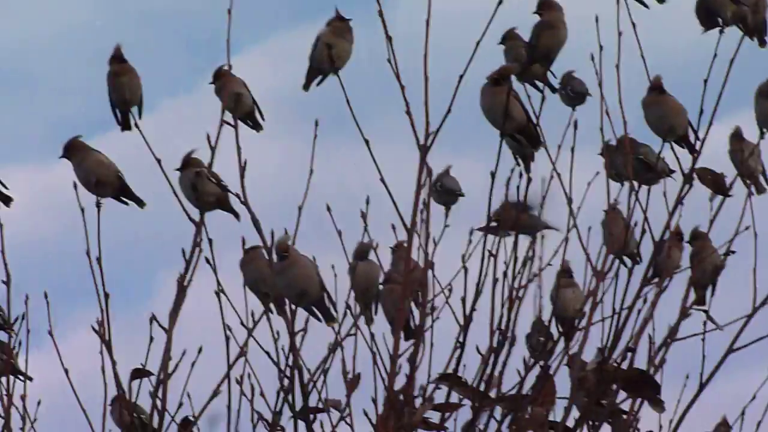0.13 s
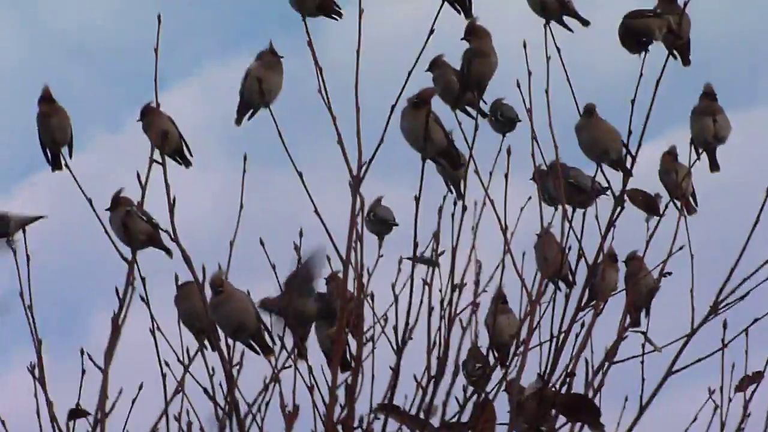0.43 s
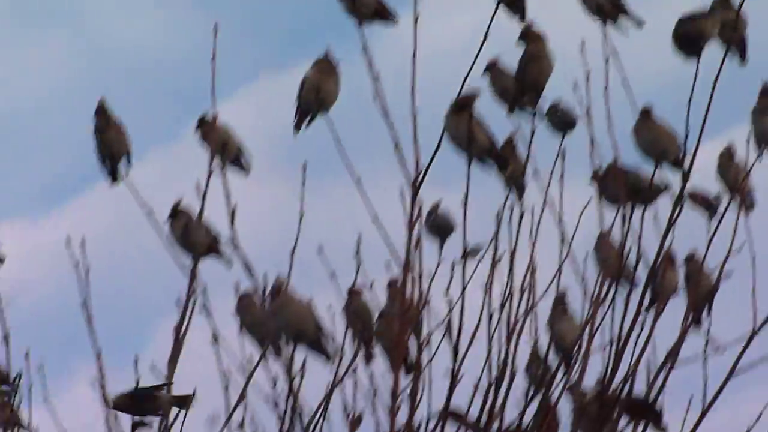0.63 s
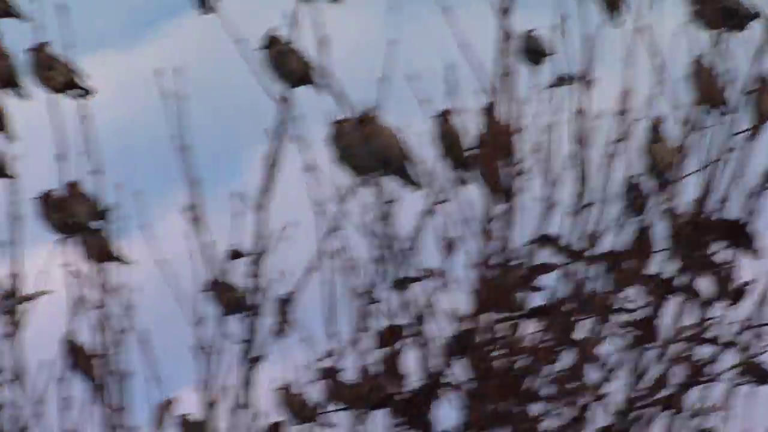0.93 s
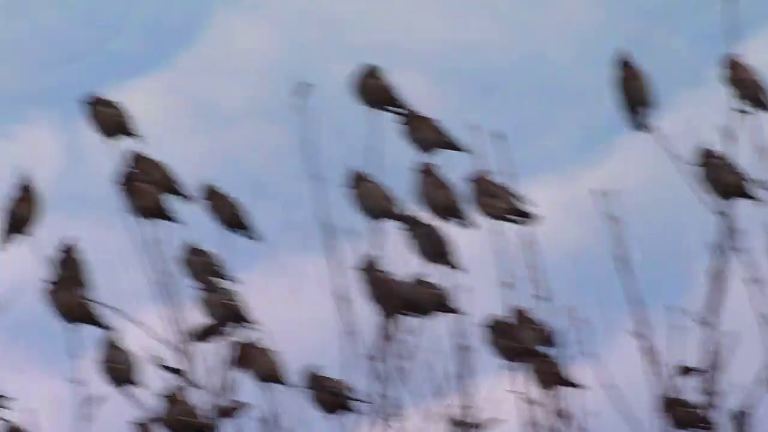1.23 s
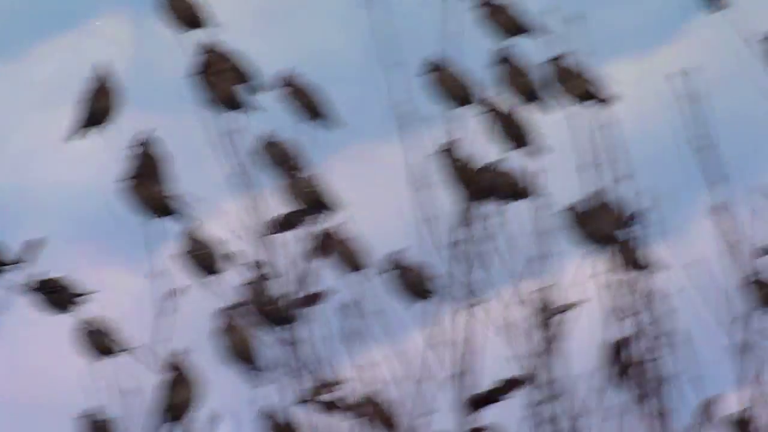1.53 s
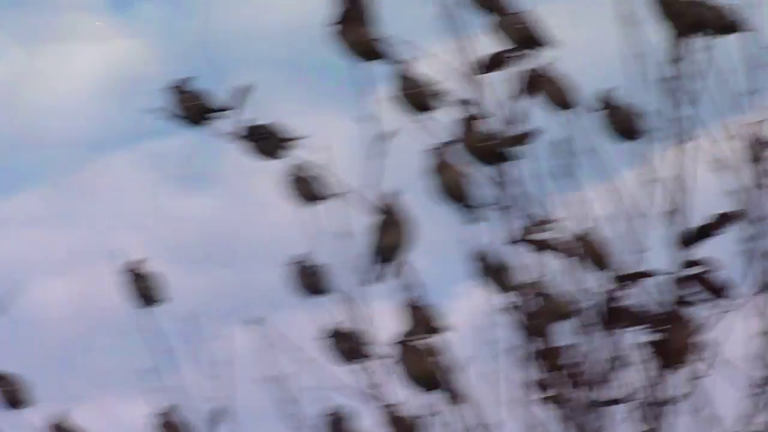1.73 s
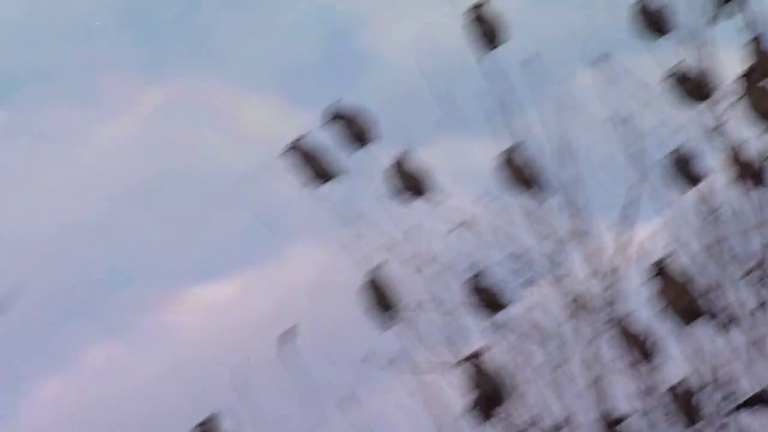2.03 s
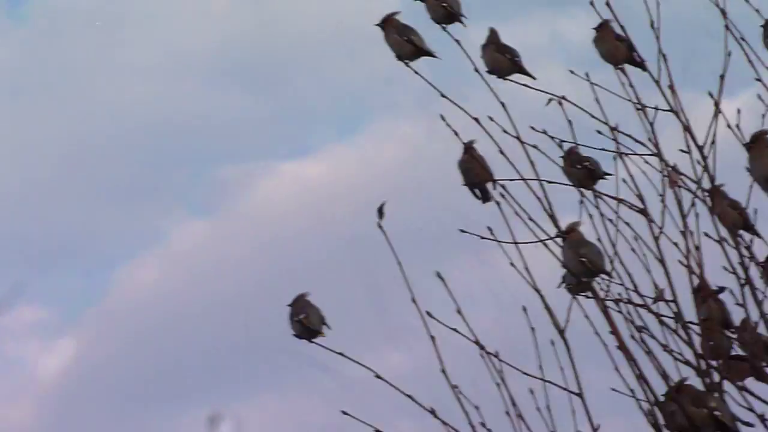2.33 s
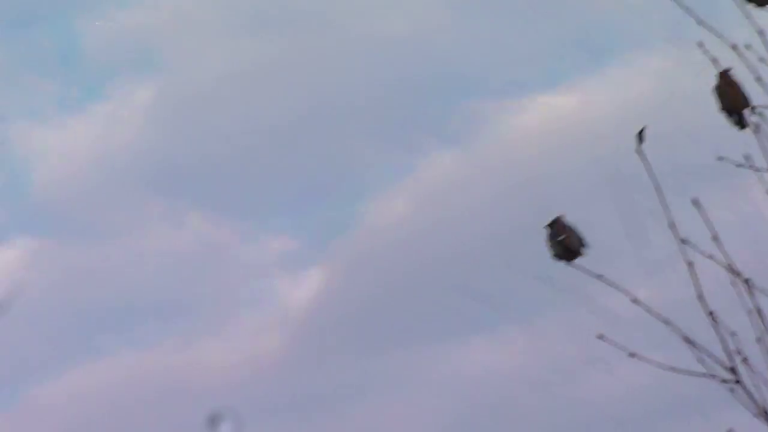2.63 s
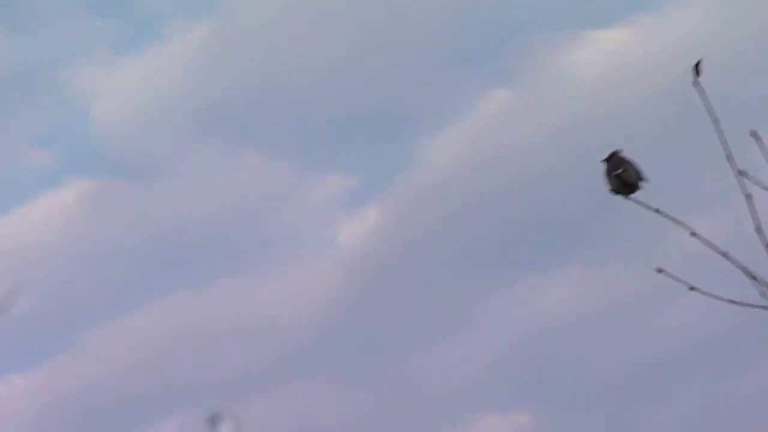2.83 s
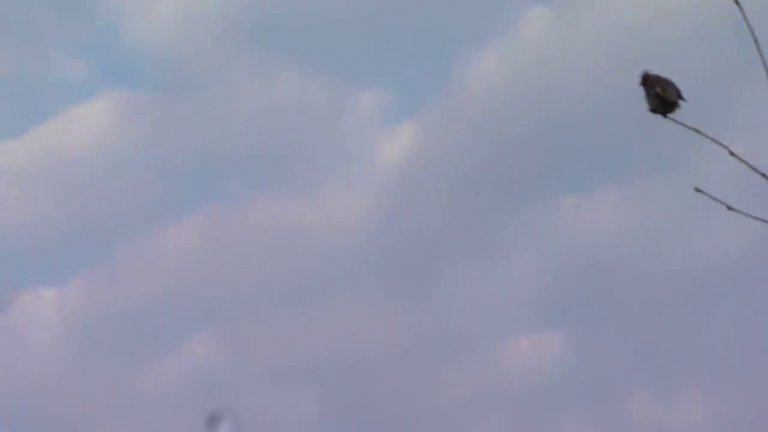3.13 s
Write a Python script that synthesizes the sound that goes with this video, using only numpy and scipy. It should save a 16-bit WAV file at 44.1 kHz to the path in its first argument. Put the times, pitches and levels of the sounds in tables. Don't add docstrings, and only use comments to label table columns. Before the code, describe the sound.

Small birds trill outdoors, each a rapid string of high, thin whistles gliding down to a raspy drop around 5 to 7 kHz. Faint at first, trills thicken and strengthen from about 1 second, overlapping until the end at about 3.3. Low distant traffic roars steadily. Twigs crack sharply at 0.53 and 0.73, tick at 1.48 and 2.79; faint wings rustle near 0.25 and 1.47. Short echo, dull treble.

```python
import sys
import numpy as np
from scipy import signal
from scipy.fft import rfft, irfft, next_fast_len
from scipy.io import wavfile
from scipy.ndimage import uniform_filter1d

SR = 44100
rng = np.random.default_rng(int(sys.argv[2]) if len(sys.argv) > 2 else 0)


def wav_out(sig):
    wavfile.write(sys.argv[1], SR, np.round(np.clip(np.atleast_2d(sig).T, -1, 1) * 32767).astype(np.int16))


def attenuation_scalar(level_db):
    decades = np.asarray(level_db, float) / 20
    return 10 ** decades


N = 145530


def evened(x):
    return x / np.sqrt(np.mean(x ** 2) + 1e-20)


def read(points, hz):
    point_hz, db = np.transpose(points)
    return np.interp(np.log(hz + 1), np.log(point_hz + 1), db)


def add(mix, start_s, sound):
    at = round(start_s * SR)
    sound = sound[max(-at, 0):]
    part = mix[max(at, 0):][:len(sound)]
    part += sound[:len(part)]


def band(x, low_hz, high_hz, order=2):
    return signal.sosfilt(signal.butter(order, [low_hz, high_hz], "band", fs=SR, output="sos"), x)


def slow(size):
    once = uniform_filter1d(rng.standard_normal(4000), size)
    return evened(uniform_filter1d(once, size))


# frequency in Hz, level in dB per Hz.
ROAR_SPECTRUM = [(19, -40), (33, -8), (86, 1), (307, -0.5), (437, -4.5), (834, 0), (1290, -8.5),
                 (2730, -29), (4800, -38), (6240, -61.5), (10600, -120)]


def tyre_roar():
    frames, hz = N // 256 + 5, np.fft.rfftfreq(1024, 1 / SR)
    real, imaginary, drift = rng.standard_normal((frames, 513, 3)).T
    sway = evened(uniform_filter1d(drift[0], size=40))
    patches = uniform_filter1d(drift, size=8, axis=0)
    patches = evened(uniform_filter1d(patches, size=14, axis=1))
    level_db = read(ROAR_SPECTRUM, hz)[:, None] + 0.64 * patches + 0.17 * sway
    roar = signal.istft((real + 1j * imaginary) * attenuation_scalar(level_db), nperseg=1024, noverlap=768)[1][:N]
    return attenuation_scalar(-29) * evened(roar)


def engine_hum():
    centre_hz, width_hz = 76, 9
    hum = band(rng.standard_normal(N), centre_hz - width_hz / 2, centre_hz + width_hz / 2, order=1)
    return attenuation_scalar(-43) * evened(hum)


def thin_hiss():
    return attenuation_scalar(-59) * evened(band(rng.standard_normal(N), 3200, 6200, order=4))


# centre in seconds, length in seconds, level in dB.
WING_RUSTLES = [
    (.25, .1, -57),
    (1.47, .04, -51),
]


def wing_rustles():
    time = np.arange(N) / SR
    grain_db = 40 * uniform_filter1d(rng.standard_normal(N), size=100)
    grains = band(rng.standard_normal(N) * attenuation_scalar(grain_db), 2000, 4700)
    swell = sum(attenuation_scalar(db) * np.exp(-((time - centre_s) / length_s) ** 2)
                for centre_s, length_s, db in WING_RUSTLES)
    return evened(grains) * swell


# frequency in Hz, level in dB, 60 dB decay in seconds.
TWIG_MODES = [(1250, -2, .008), (1750, -2, .010), (2950, -2, .009), (3700, -5, .006), (4400, -2, .008),
              (5000, -2, .007), (6300, -4, .004)]
# start in seconds, peak level in dB, brightness in Hz.
TWIG_TICKS = [
    (.072, -38, 3500),
    (.1805, -28, 4300),
    (.271, -36, 4200),
    (.2902, -35, 3600),
    (.5243, -26, 3200),
    (1.484, -25, 5000),
    (1.495, -26, 3200),
    (2.160, -37, 6000),
    (2.7856, -28, 3800),
              (.5275, -14, 4900),
    (.5278, -14, 1400),
    (.5286, -21, 3000),
    (.7303, -28, 4800),
    (.7314, -20, 3300),
    (.7350, -31, 3000),
    (1.465, -34, 3000),
    (1.475, -33, 4000),
    (1.099, -32, 3000),
    (1.756, -30, 3500),
]


def twigs():
    out, t = np.zeros(N), np.arange(1500) / SR
    crack_s, width_octaves = .0001, .7
    for start_s, peak_db, bright_hz in TWIG_TICKS:
        crack = (1 + 0.44 * rng.standard_normal(len(t))) * np.exp(-t / crack_s)
        ring = np.zeros(len(t))
        for hz, mode_db, t60_s in TWIG_MODES:
            off_db = 6 * (np.log2(hz / bright_hz) / width_octaves) ** 2
            ring += attenuation_scalar(mode_db - 60 * t / t60_s - off_db) * np.sin(2 * np.pi * hz * t)
        tick = signal.fftconvolve(crack, ring)[:len(t)]
        add(out, start_s, attenuation_scalar(peak_db) * tick / abs(tick).max())
    return out


def note(end_hz, glide_s, span_hz):
    hook_s, drop_s = .006, .0058
    t = np.arange(-glide_s, drop_s, 1 / SR)
    left = np.clip(-t / glide_s, 0, 1)
    rise = np.clip((t + glide_s) / hook_s, 0, 1)
    after = np.clip(t / drop_s, 0, 1)
    gliding, dropping = t < 0, t > 0

    hz = end_hz + span_hz * left ** 1.2 - 600 * (1 - rise) ** 2 - 2300 * after
    hz = hz + 75 * slow(size=250)[:len(t)]

    flutter_db = 4.5 * np.clip(slow(size=110)[:len(t)], -2, 1) * gliding
    flutter_db = flutter_db + 1.5 * rng.standard_normal() * dropping
    level = attenuation_scalar(-left ** 2 - 9 * np.minimum(3 * after, 1) + flutter_db)
    rasp = 1 + .5 * dropping * slow(size=12)[:len(t)]
    fades = np.sin(np.pi / 2 * rise) * np.sqrt(1 - after ** 2)
    return fades * level * rasp * np.sin(2 * np.pi * np.cumsum(hz) / SR)


def trills(table, levels_db, glide_s, span_hz):
    out = np.zeros(N)
    for (first_s, gap_s, count, end_hz), db in zip(table, levels_db):
        for k, (late, wider, louder, higher) in enumerate(rng.standard_normal((count, 4))):
            arch_db = -2.5 * (2 * (k + .5) / count - 1) ** 2 + 1.2 * louder
            whistle = note(end_hz + 50 * higher, glide_s, span_hz * (1 + 0.0905 * wider))
            add(out, first_s + k * gap_s + .0012 * late - glide_s, attenuation_scalar(db + arch_db) * whistle)
    return out


SHALLOW_GLIDE_S, SHALLOW_SPAN_HZ = .042, 860


def far_flock(count=60):
    when, pace, pitch, nearness = rng.random((count, 4)).T
    starts_s = N / SR * (np.arange(count) + when) / count - .2
    rows = zip(starts_s, .048 + .012 * pace, [6] * count, 5300 + 500 * pitch)
    return trills(rows, -60.5 + 5 * nearness, SHALLOW_GLIDE_S, SHALLOW_SPAN_HZ)


# end of first glide in seconds, note spacing in seconds, number of notes,
# pitch at the end of the glide in Hz.
SHALLOW_TRILLS = [(.035, .055, 3, 5500), (.736, .0625, 5, 5300), (1.021, .0555, 5, 6150),
                  (1.392, .051, 7, 5450), (1.673, .052, 6, 5350), (1.747, .051, 4, 5450),
                  (1.969, .052, 6, 5450), (1.988, .053, 6, 5350), (2.280, .051, 5, 5300),
                  (2.304, .051, 6, 5400), (2.576, .054, 3, 5250), (2.610, .050, 3, 5300),
                  (2.733, .053, 4, 5450), (2.926, .055, 3, 5450), (3.092, .056, 4, 5400),
                  (3.086, .048, 5, 5250), (1.110, .051, 4, 5750), (1.300, .050, 3, 5600),
                  (1.432, .053, 4, 5500), (1.712, .043, 6, 5600), (2.225, .050, 3, 5650),
                  (2.495, .052, 2, 5300), (2.845, .050, 3, 5500)]
SHALLOW_LEVELS = [-51, -48, -41, -44, -41, -40, -39, -39.5, -40, -40.5, -43, -44, -44, -42, -41, -43, -47,
                  -46, -45, -43, -41, -41, -44]


def shallow_trills():
    return trills(SHALLOW_TRILLS, SHALLOW_LEVELS, SHALLOW_GLIDE_S, SHALLOW_SPAN_HZ)


# end of first glide in seconds, note spacing in seconds, number of notes,
# pitch at the end of the glide in Hz.
WIDE_TRILLS = [(.179, .054, 5, 5900), (.222, .050, 4, 5900), (.425, .052, 3, 5950), (.592, .054, 3, 5700),
               (.925, .055, 2, 5600), (1.046, .0505, 5, 5400), (1.330, .054, 3, 5800),
               (1.697, .049, 5, 5850), (1.942, .053, 3, 5900), (2.535, .050, 2, 5600),
               (2.660, .052, 3, 5700), (3.015, .056, 3, 5600), (3.165, .056, 1, 5400),
               (3.208, .051, 3, 5900)]
WIDE_LEVELS = [-51, -49.5, -48.5, -50, -48, -43, -52, -50, -48, -42.5, -54, -49, -51, -47]


def wide_trills():
    return trills(WIDE_TRILLS, WIDE_LEVELS, glide_s=.052, span_hz=1420)


def echoes(x):
    t = np.arange(SR // 4) / SR
    hits = (rng.random(len(t)) < .03) * (t > .003)
    taps = rng.standard_normal(len(t)) * hits * attenuation_scalar(-60 * t / .3)
    return x + attenuation_scalar(-5.5) * signal.fftconvolve(x, taps / np.linalg.norm(taps))[:N]


def scene():
    traffic = tyre_roar() + engine_hum() + thin_hiss()
    tree = wing_rustles() + twigs()
    birds = echoes(far_flock() + shallow_trills() + wide_trills())
    return (traffic + tree + birds)[None]


def band_limit(x):
    return signal.sosfilt(signal.butter(12, 9100, fs=SR, output="sos"), x)


# frequency in Hz, gain in dB.
MIC_RESPONSE = [(4500, 3), (6000, -4.5), (6600, -6.5), (7000, -10), (7400, -11), (7800, -65)]


def record(dry):
    size = next_fast_len(N + 4096)
    hz = np.fft.rfftfreq(size, 1 / SR)
    low_cut = hz ** 4 / (hz ** 4 + 40.0 ** 4)
    gain = attenuation_scalar(read(MIC_RESPONSE, hz)) * (hz < 8200) * low_cut
    heard = irfft(rfft(dry, size) * gain, size)[:, :N]
    mirrored = heard * np.cos(2 * np.pi * 16000 * np.arange(N) / SR)
    image = band(mirrored, 8400, 9150, order=4)
    return band_limit(heard + attenuation_scalar(-30) * image)


dry = scene()
out = record(dry)
wav_out(out)
```